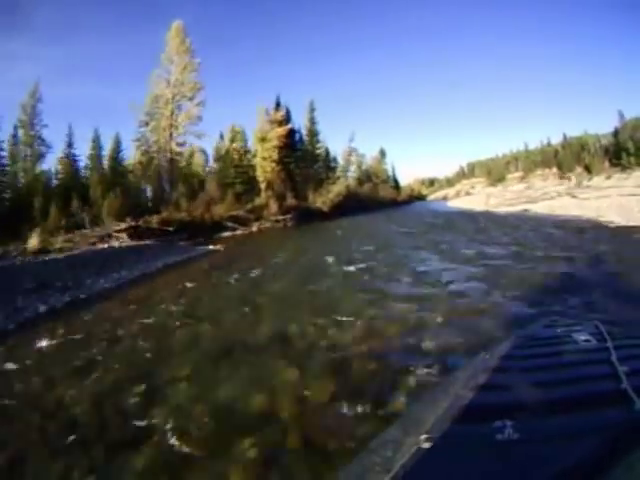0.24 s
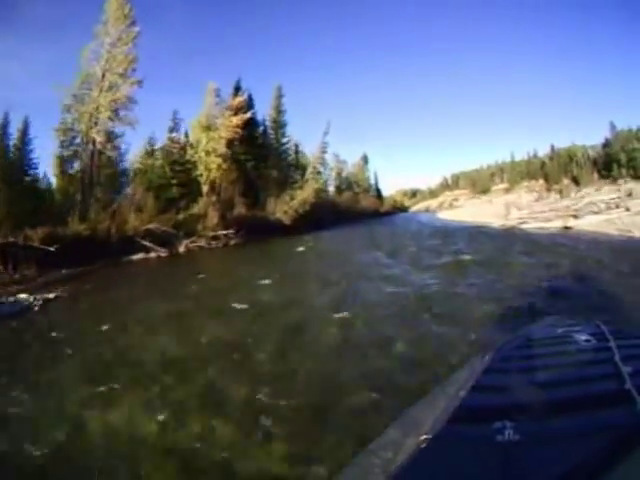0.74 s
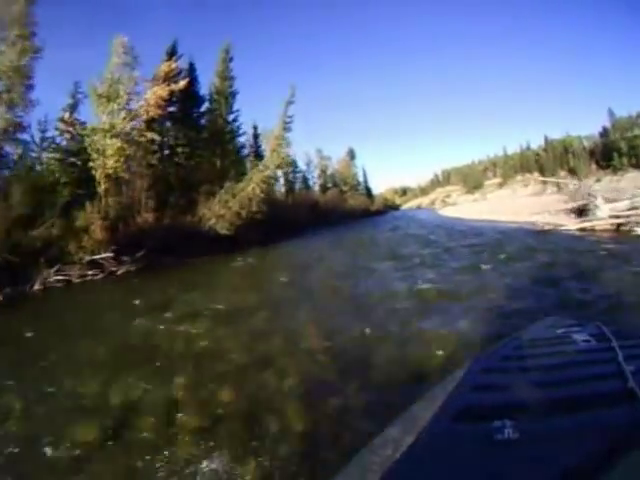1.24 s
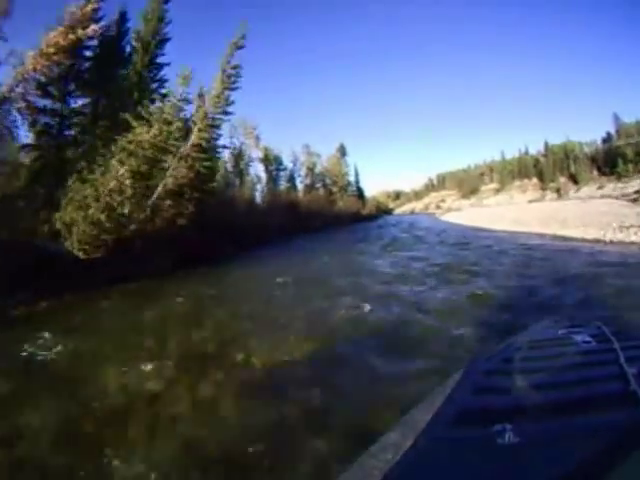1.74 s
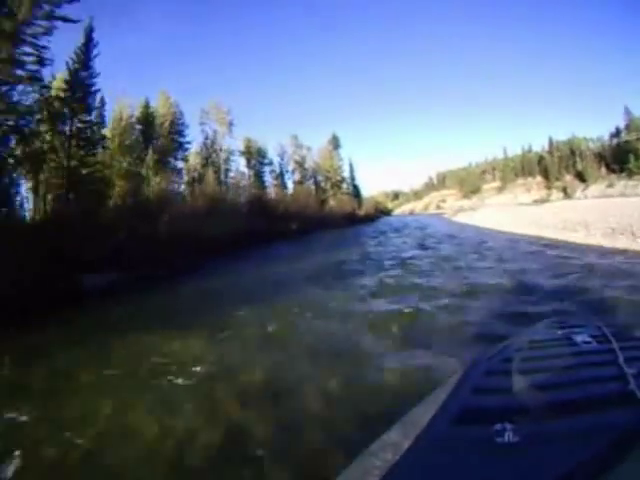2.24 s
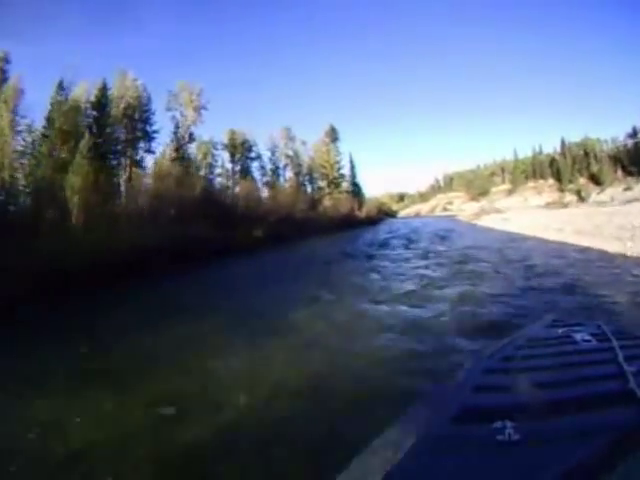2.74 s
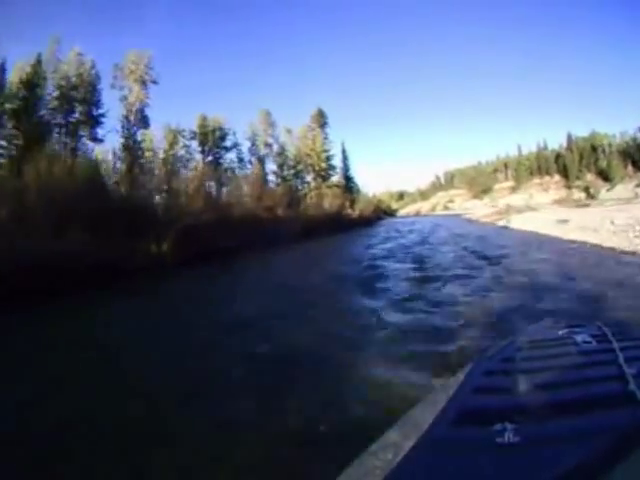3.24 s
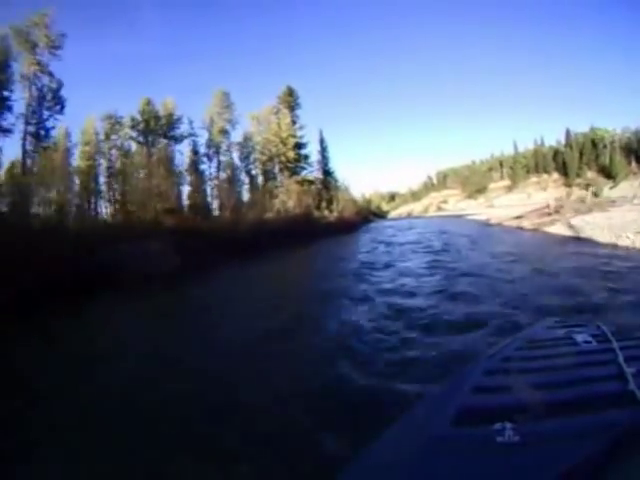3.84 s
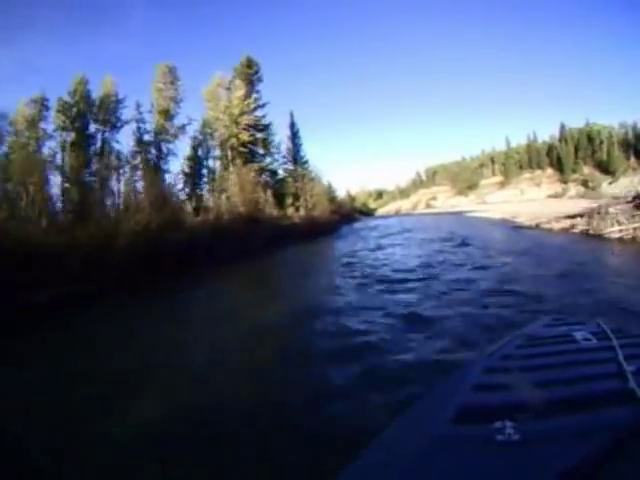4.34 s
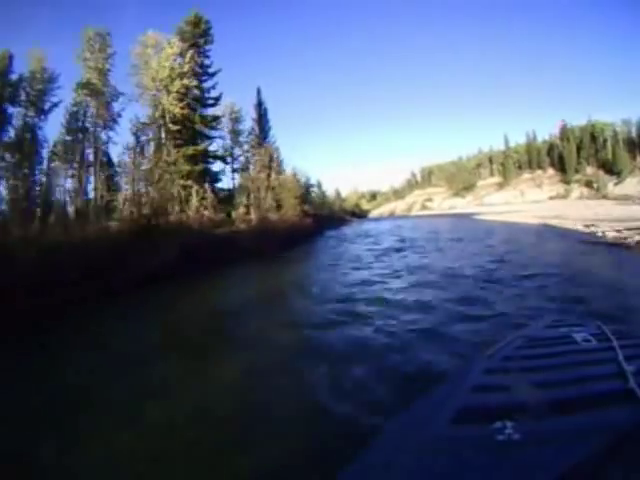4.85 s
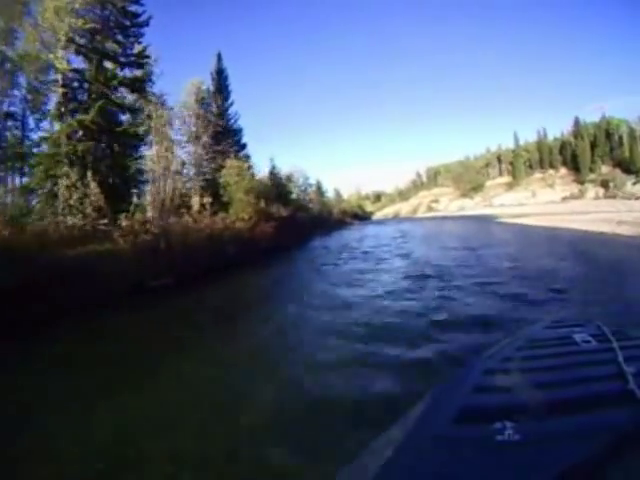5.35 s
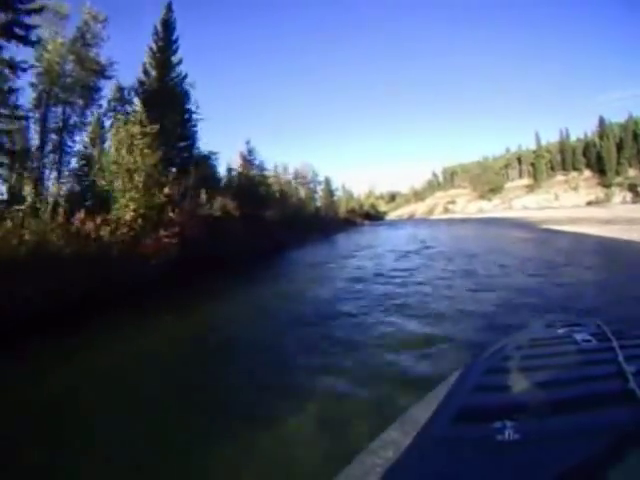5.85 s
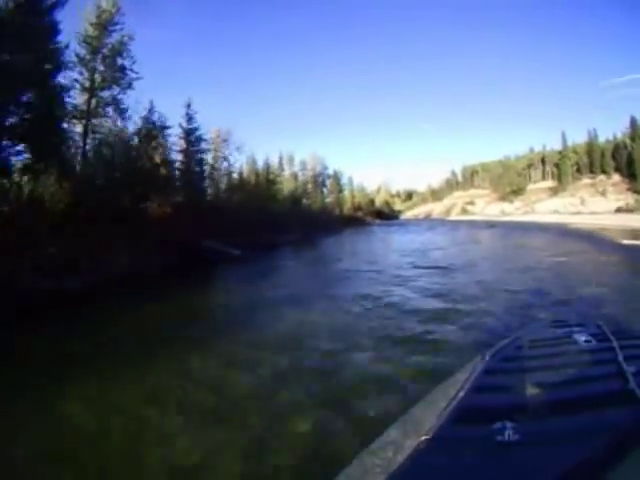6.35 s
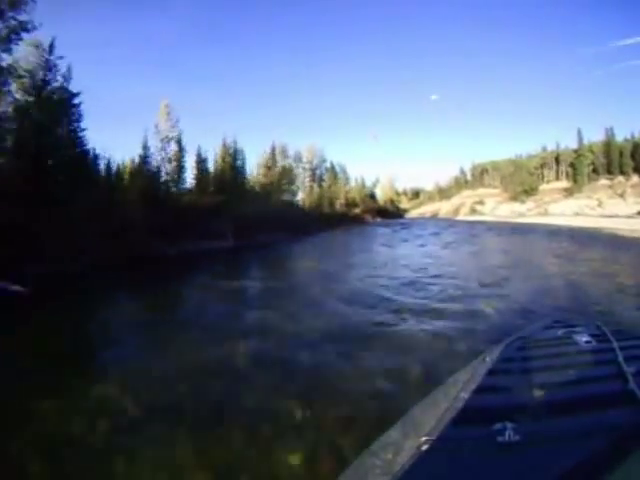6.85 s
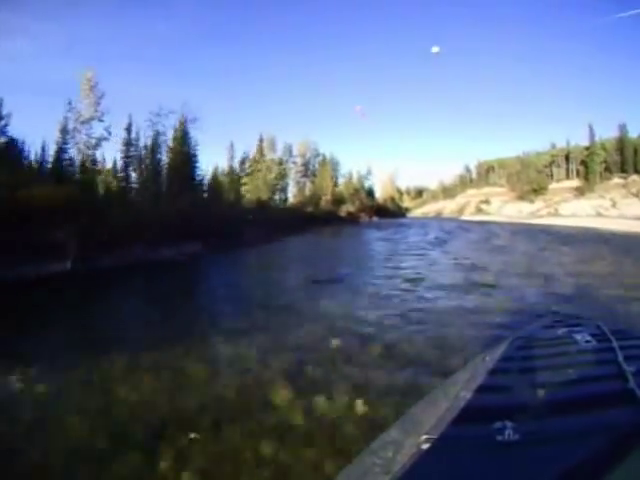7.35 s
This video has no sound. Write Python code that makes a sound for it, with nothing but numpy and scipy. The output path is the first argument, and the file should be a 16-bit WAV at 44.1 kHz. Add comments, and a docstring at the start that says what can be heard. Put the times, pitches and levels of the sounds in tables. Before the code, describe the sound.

Continuous throbbing boat motor, close and muffled, with churning water and faint spray hiss. Early on the ride is rough: a heavy thump, several hollow metal knocks and deep wind gusts. The engine slows around the middle, wavers, picks up again and finally settles a little lower while the water smooths out. Outdoors on a river, low-fidelity camera microphone aboard.

```python
"""On a shallow river, aboard a small jet boat, heard by a camera: the throttle eases, opens and eases again.
The engine is a stack of sine tones plus rattling noise, and its drive whines near one speed.
Shaped noise makes the roar, churn, spray and ripples under the hull; slaps ring the metal.
Wind buffets the microphone as deep noise, and the camera samples the sound coarsely."""
import sys
import numpy as np
from scipy import signal
from scipy.fft import rfft, irfft, next_fast_len
from scipy.io import wavfile
from scipy.ndimage import uniform_filter1d, map_coordinates

SR = 44100
rng = np.random.default_rng(int(sys.argv[2]) if len(sys.argv) > 2 else 0)


def digitize_waveform(pressure):
    """Quantize a signal to 16-bit integers and store it at the path in sys.argv[1].

    Rows of a 2-D input are taken as channels; values are limited to [-1, 1].
    """
    field = np.atleast_2d(pressure).T
    bounded = np.clip(field, -1, 1)
    quanta = np.round(bounded * 32767).astype(np.int16)
    wavfile.write(sys.argv[1], SR, quanta)


N = 335601
T = np.arange(N) / SR  # time of every sample, in seconds

# How rough the ride is, on the water and in the wind: [t/s, chop/dB]
ROUGHNESS = [(0, 3), (.3, 2), (.75, 1.5), (1.2, 4.5), (2.3, 4), (2.8, -1), (3.6, -1.5), (4.5, -1.5),
             (5.6, -2.5), (6.3, -7), (7.61, -10.5)]
# dB that each sound gains for one dB of chop
THUD_GROWS, DRUM_GROWS, SPRAY_GROWS, BUFFET_GROWS, CHURN_GROWS = 0.87, 0.2, 0.25, 0.67, 0.35

# Gusts that buffet the microphone, before the low-pass: [crest t/s, length/s, level/dB]
GUSTS = [(.29, 0.18, -21), (.78, 0.15, -19), (1.08, 0.13, -20.5), (1.93, 0.13, -17.5), (2.27, 0.35, -18.5),
         (4.47, 0.22, -19), (5.66, 0.089, -20), (5.85, 0.16, -22), (6.08, 0.13, -21.5)]
# Longer booms of the hull, from waves or from the engine's second tone meeting the hull's resonance:
# [crest t/s, length/s, thud level/dB, boom level/dB]
HULL_BOOMS = [(0.205, 0.09, -24, -30), (1.2, 0.29, -26.5, -34), (1.384, .1, -28.5, -38),
              (1.615, 0.19, -27.5, -30.5), (1.927, 0.17, -32, -28), (2.227, 0.26, -28.5, -28.5),
              (2.63, 0.23, -29.5, -29), (2.808, 0.11, -37, -29), (3.215, 0.21, -42, -29)]
# Waves that slap the hull, before the overall slap level: [t/s, peak level/dB]
SLAPS = [(0.182, -27), (0.198, -16), (1.143, -14.5), (1.449, -18.5), (1.584, -24), (2.211, -27.5),
         (2.611, -32), (6.246, -21.5)]
# Ringing modes of the hull, relative levels: [f/Hz, time to fall 60 dB/s, level/dB]
HULL_MODES = [(62, 0.16, -5), (105.5, 0.038, 1), (139, 0.092, -3), (281, 0.083, -13.5)]
# Sheets of spray off the bow, before the overall splash level: [crest t/s, length/s, level/dB]
SPLASHES = [(1.1, .13, -56), (1.62, .12, -61.5), (1.93, .13, -57.5), (2.24, .2, -56), (3.31, .22, -59.5),
            (3.99, .13, -60.5), (4.53, 0.23, -61), (5.4, 0.39, -61), (5.86, .1, -59)]

# Colours of noise, each with relative levels per Hz: [f/Hz, level/dB]
BUFFET_COLOUR = [(6, -28), (12, -14.5), (18, -4.5), (23, 0.5), (30, -12), (45, -22), (70, -38.5),
                 (150, -88.5)]
THUD_COLOUR = [(20, -17), (36, -3.5), (46, -2), (56, -3.5), (70, -3), (100, -4), (130, -9.5), (200, -24),
               (400, -45.5)]
BOOM_COLOUR = [(40, -35.5), (75, -15.5), (105, -10), (122, -1.5), (142, 2), (172, -5.5), (205, -19.5),
               (270, -20), (400, -33), (800, -48)]
SPRAY_COLOUR = [(400, -13), (850, -3.5), (1080, -7.5), (1300, -3.5), (1700, 0), (2100, -5.5), (2700, 0),
                (3300, 0.5), (3700, -1.5), (4000, -5.5)]
ROAR_COLOUR = [(120, -13.5), (220, -3), (270, 5), (350, -0.5), (440, -6.5), (540, -11), (660, -13.5),
               (960, -17.5), (1080, -24), (1300, -16.5), (1800, -30.5), (3000, -47)]
CHURN_COLOUR = [(350, -22), (550, -4.5), (700, -6), (830, 0.5), (950, -3.5), (1080, -16.5), (1300, -6.5),
                (2000, -35)]

# Engine speed before a slight unsteadiness: [t/s, turns per second/Hz]
ENGINE_SPEED = [(0, 88.4), (2.24, 88.3), (2.4, 85), (2.55, 81), (2.67, 78.9), (3, 77.2), (3.16, 74.8),
                (3.57, 74.8), (3.73, 80), (3.8, 81.2), (3.92, 83.5), (5.18, 83.9), (5.33, 81.3),
                (5.52, 79.75), (7.61, 79.75)]
# How hard the engine works, as added level: [t/s, exhaust throb level/dB, drone level/dB]
ENGINE_LOAD = [(0, 2.5, 2.5), (.85, -2, -0.5), (2.45, -0.5, -2.5), (2.72, -2.5, -8.5), (3.15, 6, -1),
               (3.48, -1.5, -1), (3.68, -7, -4.5), (3.8, 2, -0.5), (5.3, 1, -0.5), (5.9, -2.5, -3.5),
               (6.3, 1.5, 0.5), (7.61, 2, 2)]
# The four engine speeds at which the tone levels are given: [turns per second/Hz]
MAP_SPEEDS = [75, 79.8, 83.8, 88.3]
# Engine tones before load and wavering: [multiple of engine speed, rms level/dB at each of MAP_SPEEDS]
ENGINE_TONES = [(1, -42.5, -43, -39.5, -35), (2, -36.5, -44, -35.5, -37), (3, -52, -51.5, -46.5, -48),
                (4, -49, -52.5, -68.5, -55), (5, -48.5, -56, -53.5, -59.5), (6, -54.5, -56, -63, -73.5),
                (7, -68, -61, -52.5, -58.5), (8, -62, -74, -78, -72), (9, -71.5, -63, -64.5, -67),
                (10, -67, -65.5, -77.5, -64.5), (11, -60.5, -70, -73, -70), (12, -77, -65, -68.5, -87.5),
                (13, -77, -78.5, -85, -68), (14, -90.5, -83, -74, -67), (15, -83, -68, -64, -63.5),
                (16, -68.5, -75.5, -65.5, -67.5), (17, -71.5, -82.5, -70.5, -71),
                (18, -78, -63.5, -64, -81), (20, -65.5, -76, -75.5, -69.5)]
# Ringing panels of the engine housing, relative levels: [f/Hz, width/Hz, level/dB]
HOUSING_PANELS = [(1320, 260, -7.5), (1521, 80, 0.5), (1843, 84, -4), (2428, 84, -0.5), (2772, 180, -5),
                  (3296, 54, -5.5)]

SLAP_ATTACK_S = 0.003
OVERLOAD_S = 2.231  # middle of the brief cut in the sound
CAMERA_HZ = 8000  # samples the camera takes per second
TOP_HZ = 15700  # nothing is heard above this


def amp(db):
    """Turns decibels into gain."""
    return 10 ** (np.asarray(db) / 20)


def unit(x):
    """Scales a signal to rms 1."""
    return x / np.sqrt(np.mean(x ** 2) + 1e-20)


def curves(rows):
    """Draws straight lines through the rows: one value per sample for each column after the time."""
    s, *columns = np.transpose(rows)
    return [np.interp(T, s, column) for column in columns]


def wobble(rate):
    """A smooth random curve through rate random points per second."""
    points = rng.standard_normal(int(N * rate / SR) + 4)
    return map_coordinates(points, [T * rate])


def humps(rows):
    """A gain that rises and falls smoothly around each (crest time, length, dB) event."""
    total = 0
    for s, length, db in rows:
        phase = np.clip((T - s) / length, -0.5, 0.5)
        total = total + amp(db) * np.cos(np.pi * phase) ** 2
    return total


def filtered(x, response):
    """Multiplies the spectrum of x by a response that depends on frequency."""
    size = next_fast_len(N + SR // 2)  # spare room lets ringing die out
    spectrum = rfft(x, size) * response(np.fft.rfftfreq(size, 1 / SR))
    return irfft(spectrum, size)[:N]


def noise(colour):
    """Random noise of rms 1, coloured by (Hz, dB) points."""
    hz, db = np.transpose(colour)

    def response(f):
        return amp(np.interp(np.log(f + 1), np.log(hz), db, right=-120))

    return unit(filtered(rng.standard_normal(N), response))


def steadied(x, share):
    """Evens out a share of the noise's own swells by dividing by its envelope."""
    envelope = np.abs(signal.hilbert(x))
    return unit(x / (envelope + 0.12) ** np.clip(share, 0, 1))


def patchy(x, depth_db, size_hz, size_time):
    """Noise whose colour changes from moment to moment; sizes count spectrogram cells."""
    z = signal.stft(x, nperseg=1024)[2]
    field = uniform_filter1d(rng.standard_normal(z.shape), size_hz, axis=0)
    field = uniform_filter1d(field, size_time, axis=1)
    return unit(signal.istft(z * amp(depth_db * unit(field)), nperseg=1024)[1][:N])


def resonant(x, peaks):
    """Passes x through side-by-side (Hz, width, dB) resonances of alternating sign."""
    def response(f):
        total = 0
        for k, (center, width, db) in enumerate(peaks):
            band = 1j * f * width / (center * center - f * f + 1j * f * width)
            total = total + (-1) ** k * amp(db) * band
        return total

    return filtered(x, response)


def buffeting(chop_db, level_db, fits_db, edge_hz):
    """Wind buffets the microphone as deep noise, in fits, swelling at each gust."""
    steady_strength = amp(level_db + BUFFET_GROWS * chop_db + fits_db * wobble(9))
    strength = np.hypot(steady_strength, humps(GUSTS))
    rumble = strength * steadied(noise(BUFFET_COLOUR), share=1.0)
    return filtered(rumble, lambda f: 1 / (1 + (f / edge_hz) ** 6))


def overload():
    """A strong gust overloads the microphone and cuts the sound for about a hundredth of a second."""
    return 1 - np.exp(-((T - OVERLOAD_S) / 0.005) ** 6)


def spray(chop_db, level_db, splash_db, flutter_db, spatter_db):
    """Spray off the bow is hissing noise with fast random spatter; now and then a sheet swells it."""
    steady_flow = amp(level_db + SPRAY_GROWS * chop_db + flutter_db * wobble(18))
    flow = np.hypot(steady_flow, amp(splash_db) * humps(SPLASHES))
    hiss = patchy(noise(SPRAY_COLOUR), depth_db=1.5, size_hz=6, size_time=3)
    return flow * unit(hiss * amp(spatter_db * wobble(300)))


def water(chop_db, thud_db, drum_db, ripple_db):
    """Ripples thud and boom under the hull, harder in rough water; the longer hull booms swell both."""
    thuds = humps((s, length, db) for s, length, db, _ in HULL_BOOMS)
    booms = humps((s, length, db) for s, length, _, db in HULL_BOOMS)
    thud_gain = np.hypot(amp(thud_db + THUD_GROWS * chop_db + ripple_db * wobble(8.1)), thuds)
    boom_gain = np.hypot(amp(drum_db + DRUM_GROWS * chop_db + ripple_db * wobble(12)), booms)
    thudding = thud_gain * steadied(noise(THUD_COLOUR), share=0.45)
    booming = boom_gain * steadied(noise(BOOM_COLOUR), share=0.58)
    return thudding + booming


def slaps(level_db, attack):
    """Each slapping wave sets the hull's low modes ringing, and they die away."""
    out = np.zeros(N + SR)
    t = np.arange(SR // 3) / SR
    ring = np.zeros(len(t))
    for hz, t60, db in HULL_MODES:
        ring += amp(db - 60 * t / t60) * np.sin(2 * np.pi * hz * t)
    ring *= 1 - np.exp(-t / attack)
    ring /= np.abs(ring).max()
    for s, db in SLAPS:
        out[round(s * SR):][:len(t)] += amp(db + level_db) * ring
    return out[:N]


def jet(angle, chop_db, roar_db, churn_db, pulse_db):
    """The exhaust roars and the jet churns the river behind the stern, both throbbing with the engine."""
    roar = amp(roar_db + 0.87 * wobble(5.8)) * noise(ROAR_COLOUR)
    surge_db = CHURN_GROWS * chop_db + 1.6 * wobble(12)
    churn = amp(churn_db + surge_db) * patchy(noise(CHURN_COLOUR), depth_db=2, size_hz=4, size_time=6)
    return (roar + churn) * unit(amp(pulse_db * np.cos(angle)))


def whine(speed, angle, order, peak_hz, width_hz, level_db, waver_db, rough):
    """One high multiple of the engine speed sings out when it meets a sharp resonance."""
    response = 1 / (1 + (2 * (order * speed - peak_hz) / width_hz) ** 2)
    tone = np.sin(order * angle + rough * wobble(60))
    return amp(level_db + waver_db * wobble(30)) * response * tone


def clatter(angle, level_db, pulse_db):
    """Noise that swells a little on each turn rattles the panels of the engine housing."""
    bursts = rng.standard_normal(N) * amp(pulse_db * np.cos(angle) + 1.2 * wobble(60))
    return amp(level_db) * unit(resonant(bursts, HOUSING_PANELS))


def hum(speed, angle, throb_db, drone_db, waver_db, flutter_db):
    """Tones at multiples of engine speed shift balance with it; the lowest two are the steadier throb."""
    out = np.zeros(N)
    for order, *levels in ENGINE_TONES:
        waver = waver_db * wobble(11)
        if order <= 2:
            load_db = throb_db + 0.5 * waver
        else:
            load_db = drone_db + waver
        level_db = np.interp(speed, MAP_SPEEDS, levels) + load_db
        out += amp(level_db) * np.sin(order * angle + rng.uniform(0, 2 * np.pi))
    # sqrt(2) turns rms into peak; all tones flutter together
    return np.sqrt(2) * out * amp(flutter_db * wobble(40))


def scene():
    """Wind, water and engine, added at one microphone."""
    speed = curves(ENGINE_SPEED)[0] * (1 + 0.001 * wobble(16))
    angle = 2 * np.pi * np.cumsum(speed) / SR  # how far the engine has turned, in radians
    throb_db, drone_db = curves(ENGINE_LOAD)
    chop_db, = curves(ROUGHNESS)

    wind = buffeting(chop_db, level_db=-28, fits_db=4.5, edge_hz=35)
    bow = spray(chop_db, level_db=-58.0, splash_db=3, flutter_db=0.58, spatter_db=1.5)
    hull = water(chop_db, thud_db=-40.5, drum_db=-38.0, ripple_db=2.5)
    hull += slaps(level_db=-1, attack=SLAP_ATTACK_S)
    stern = jet(angle, chop_db, roar_db=-47.5, churn_db=-57.5, pulse_db=2.0)
    drive = whine(speed, angle, order=19, peak_hz=1529.3, width_hz=36.6,
                  level_db=-51, waver_db=3.0, rough=0.6)
    engine = clatter(angle, level_db=-55.5, pulse_db=1.0)
    engine += hum(speed, angle, throb_db, drone_db, waver_db=2, flutter_db=1.87)

    # only the deep wind noise carries on through the brief cut
    return ((bow + hull + stern + drive + engine) * overload() + wind)[None]


def record(dry):
    """The camera joins its coarse samples by straight lines, which mirrors the sound faintly into the treble."""
    narrow = filtered(dry[0], lambda f: f < CAMERA_HZ / 2)
    ticks = np.arange(0, N / SR, 1 / CAMERA_HZ)
    samples = np.interp(ticks, T, narrow)
    joined = np.interp(T, ticks, samples)
    return filtered(joined, lambda f: f < TOP_HZ)[None]


dry = scene()
out = record(dry)
digitize_waveform(out)
```